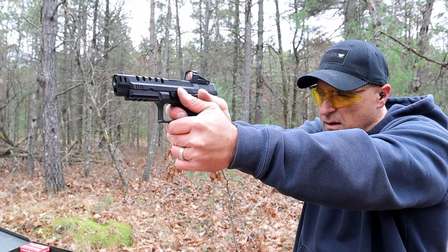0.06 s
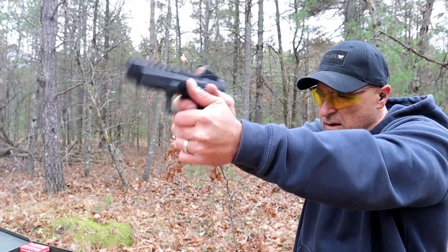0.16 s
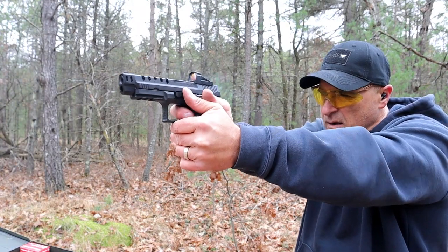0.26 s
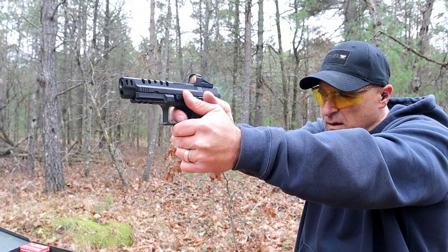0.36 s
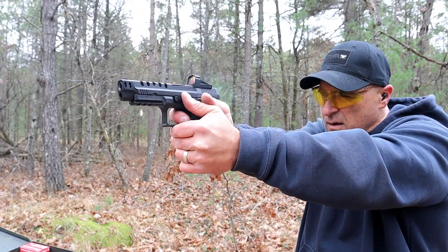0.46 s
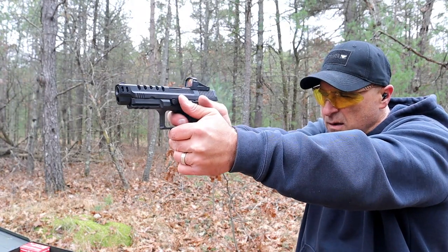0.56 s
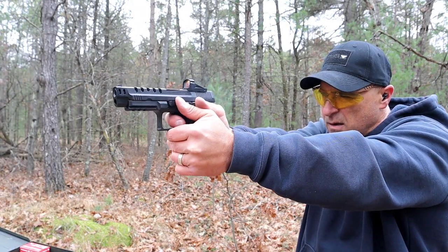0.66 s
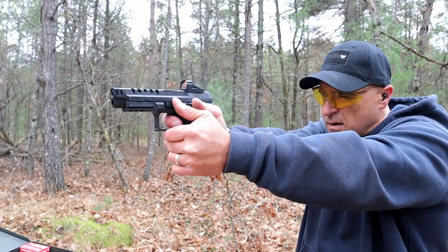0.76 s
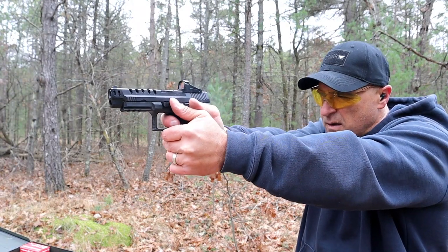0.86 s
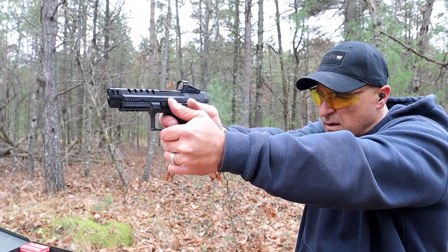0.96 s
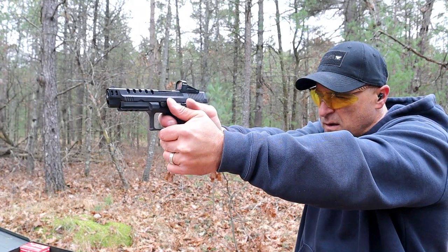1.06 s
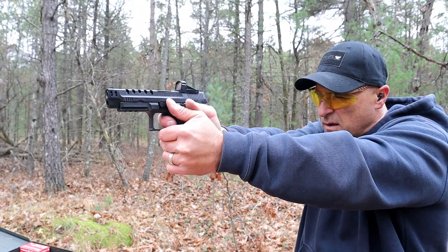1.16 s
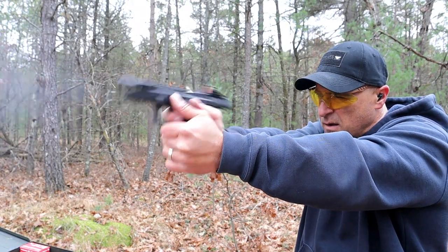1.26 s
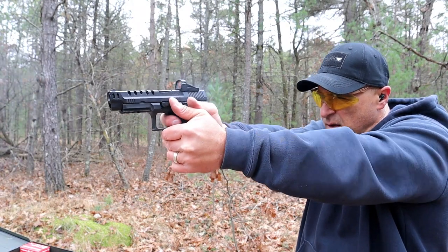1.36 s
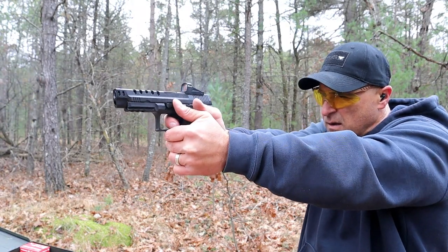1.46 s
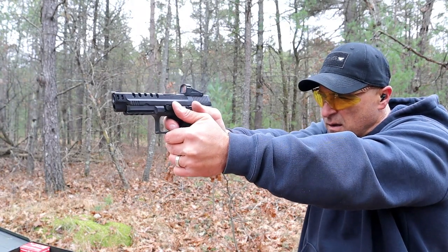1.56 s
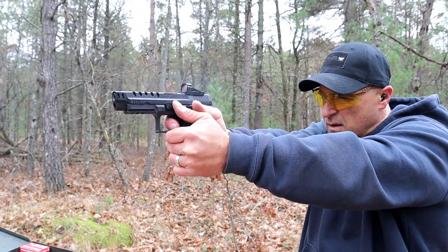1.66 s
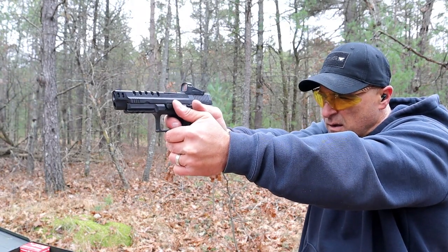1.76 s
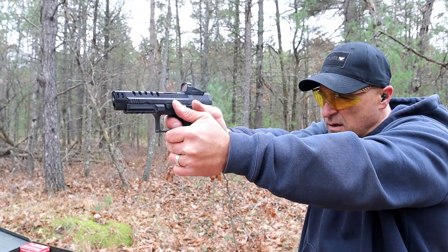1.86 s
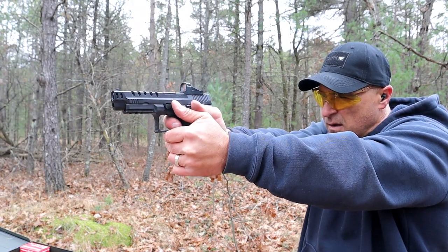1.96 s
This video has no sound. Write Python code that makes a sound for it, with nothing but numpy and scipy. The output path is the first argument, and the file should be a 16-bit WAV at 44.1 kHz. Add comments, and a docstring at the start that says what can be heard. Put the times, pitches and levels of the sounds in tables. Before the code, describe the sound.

A fading gunshot echo, then a handgun blast with a metallic ping downrange and a wash off the trees; faint handling ticks and a rustle, then a second blast with a sharper steel clang. Outdoors, close, clipped microphone.

```python
"""Two pistol shots at the edge of a wood, over the dying echo of an earlier one.
Each blast is a sharp shock wave plus fading noise and short rings, and it overloads the microphone.
The trees throw back a swelling, darkening wash of noise, and a steel plate rings downrange as a set of
beating tones. The clacks of the action, small ticks, a soft bump and a rustle are short bursts of noise.
A faint hiss and an outdoor rumble lie underneath."""
import sys
import numpy as np
from scipy import signal
from scipy.fft import rfft, irfft
from scipy.io import wavfile

SR = 44100
rng = np.random.default_rng(int(sys.argv[2]) if len(sys.argv) > 2 else 0)


def unload_audio(sound):
    """Save the sound as a 16-bit wav file, at the path given as the first command line argument."""
    columns = np.transpose(np.atleast_2d(sound))
    # keep every value between -1 and 1, then stretch to whole-number steps
    steps = np.round(np.clip(columns, -1, 1) * 32767)
    wavfile.write(sys.argv[1], SR, steps.astype(np.int16))


N = 90405
T = np.arange(N) / SR  # time in seconds

# The shots; the first comes before the sound begins, so only its echo is left.
# Each row: start in seconds, level of the blast in dB, level of the echo in dB.
SHOTS = [(-1.04, 0, -2.5), (0.2192, 3, 0.16), (1.3686, 3.5, -1)]


def from_db(db):
    """Turn decibels into a gain."""
    return 10 ** (np.asarray(db) / 20)


def rms_one(x):
    """Scale a sound to an rms (average strength) of 1."""
    return x / np.sqrt(np.mean(x ** 2) + 1e-20)


def noise(low_hz, high_hz):
    """Make noise between two frequencies, with an rms of 1."""
    band = [low_hz, min(high_hz, .45 * SR)]
    sos = signal.butter(2, band, "band", fs=SR, output="sos")
    white = rng.standard_normal(N + SR)
    return rms_one(signal.sosfilt(sos, white)[SR:])  # drop the second in which the filter settles


def noise_around(centre_hz):
    """Make noise in a narrow band around one frequency."""
    width = 1.31  # band edges as a ratio to the centre
    return noise(centre_hz / width, centre_hz * width)


def drift(rate_hz):
    """Make a smooth random wander around zero, with an rms of 1."""
    hz = np.arange(N // 2 + 1) * SR / N
    spectrum = rfft(rng.standard_normal(N))
    return rms_one(irfft(spectrum / (1 + (hz / rate_hz) ** 4), N))


def bands(table):
    """Split white noise into third octaves; give each at its table level, with the table's last column."""
    hz, level_db, extra = np.transpose(table)
    table_octave = np.log2(hz)
    white = rfft(rng.standard_normal(N)) * np.sqrt(SR / 2)  # 0 dB per Hz
    octave = np.log2(np.arange(N // 2 + 1) * SR / N + 1)
    for centre in np.arange(14, 44) / 3:
        distance = np.clip(3 * (octave - centre), -1, 1)
        window = np.cos(np.pi / 2 * distance) ** 2  # neighbouring bands overlap
        gain = from_db(np.interp(centre, table_octave, level_db))
        yield irfft(white * window, N) * gain, np.interp(centre, table_octave, extra)


def envelope(start, t60, attack=0, hold=0):
    """Rise in a straight line, hold (counted from the start), then fall by 60 dB in every t60 seconds."""
    age = T - start
    rise = np.clip(age / (attack + 1 / SR), 0, 1)
    return rise * np.exp(-np.log(1000) * np.maximum(age - hold, 0) / t60)


def ring(start, hz, t60):
    """A struck mode is a sine that starts at once and dies away."""
    return np.sin(2 * np.pi * hz * (T - start)) * envelope(start, t60)


def background():
    """A faint hiss and an outdoor rumble are two steady bands of noise."""
    hiss = from_db(-73) * noise(100, 13000)
    rumble = from_db(-69.5) * noise(30, 110)
    return hiss + rumble


def wood():
    """The echo swells as the blast reaches the trees, then thins with distance and loses its treble."""
    # The echo from the trees, before the level of each shot is added.
    # Each row: frequency in Hz, level in dB per Hz, loss to air and leaves in dB per second.
    echo_bands = [(40, -85.5, 10.5), (110, -69.5, 12), (203, -70, 12.5), (354, -56.5, -2), (625, -49, -3.5),
                  (990, -49, -2), (1560, -54, 5), (2410, -54.5, 15), (4400, -59, 34), (8500, -56, 67.5),
                  (14700, -69, 86.5)]
    treeline_s, swell_s = 0.2, 0.053  # round trip to the trees, build-up
    clearing_db = -8.5  # level before the swell
    spread_power = 1.502  # how steeply it falls with distance
    trunk_grain_db, trunks_per_s = 1.5, 90  # roughness of the echo

    ages = np.array([np.maximum(T - start, 0) for start, _, _ in SHOTS])
    levels = from_db([[echo_db] for _, _, echo_db in SHOTS])
    swell = np.exp(-.5 * (np.minimum(ages - treeline_s, 0) / swell_s) ** 2)
    build_up = swell + from_db(clearing_db) * (1 - swell)
    spreading = np.maximum(ages / treeline_s, 1) ** -spread_power
    shapes = levels * (ages > 0) * build_up * spreading
    coarse = slice(None, None, 40)  # work out the slow gains at every 40th sample
    out = 0
    for band, loss in bands(echo_bands):
        gains = shapes[:, coarse] * from_db(-loss * ages[:, coarse])
        total_gain = np.linalg.norm(gains, axis=0)  # the echoes add as energy
        out = out + band * np.interp(T, T[coarse], total_gain)
    return out * from_db(trunk_grain_db * drift(trunks_per_s))


def clicks():
    """Clacks of the action and small handling ticks are short bursts of narrow noise."""
    # Each row: start in seconds, level in dB, centre in Hz, time to fall by 60 dB in seconds.
    click_rows = [(.154, -52, 7500, .03), (.196, -55, 8500, .012), (.2702, -14, 8300, .025),
                  (.2877, -13, 6000, .007), (.804, -53, 11000, .02), (.932, -52, 6000, .015),
                  (1.025, -53, 5000, .03), (1.141, -57, 8000, .02), (1.236, -52, 6500, .02),
                  (1.255, -59, 8000, .02), (1.4177, -14, 8300, .025), (1.4323, -13, 1900, .025)]
    return sum(from_db(db) * noise_around(hz) * envelope(start, t60) for start, db, hz, t60 in click_rows)


def blasts():
    """An ignition crack, a shock wave, a jet of gas, and quick scatter and ringing from close by."""
    # The muzzle blast scattered off the nearby ground, before the level of each shot is added.
    # Each row: frequency in Hz, level in dB per Hz, time to fall by 60 dB in seconds.
    scatter_bands = [(40, -36.5, 0.04), (110, -29, 0.054), (250, -32, 0.065), (550, -35, 0.13),
                     (1114, -30.5, 0.086), (2000, -31.5, 0.051), (4300, -37.5, 0.068), (8500, -35, 0.053),
                     (14800, -47, 0.059)]
    # The hollow ring of the shooting position, before the level of each shot is added.
    # Each row: frequency in Hz, level in dB, time to fall by 60 dB in seconds.
    hollow_modes = [(100, -9, 0.059), (549, -8.5, 0.14), (770, -16.5, .1), (1040, -5, 0.083)]
    shock_s = .0005  # time for the shock's pressure to fall through zero
    lead_s = 0.0014  # the crack of ignition comes just ahead of the blast

    out = np.zeros(N)
    scatter = list(bands(scatter_bands))
    for start, blast_db, _ in SHOTS:
        lead = from_db(-13.5) * noise(1700, 3500) * envelope(start - lead_s, 0.025)
        phase = np.maximum(T - start, 0) / shock_s
        shock = from_db(13) * (T > start) * (1 - phase) * np.exp(-phase)
        jet = from_db(13.5) * noise(3000, 9000) * envelope(start, 0.013)  # gas leaving the muzzle
        near = sum(band * envelope(start, t60) for band, t60 in scatter)
        hollow = sum(from_db(db) * ring(start, hz, t60) for hz, db, t60 in hollow_modes)
        out += from_db(blast_db) * (lead + shock + jet + near + hollow)
    return out


def plates():
    """A splash, then each steel mode beats with its twin and arrives by many paths, so it wavers as it dies."""
    # The bullets striking steel.
    # Each row: start in seconds, attack in seconds, change of the ring in dB, level of the splash in dB.
    hits = [(.295, 0.081, 0.3, -44), (1.476, 0.0063, 2.36, -23)]
    # One list of modes for each hit, held up by the echoes; each mode has a close twin that beats with it.
    # Each row: frequency in Hz, rms level in dB with the beating and fading included (before the envelope
    # and the hit's change), hold in seconds, time to fall by 60 dB in seconds, distance to the twin in Hz,
    # strength of the twin as a share.
    plate_modes = [
        [(2064, -31, .29, 1.8, 2.2, .42), (3381, -37, .12, .85, 11, .3), (3560, -39.5, .11, .8, 14, .4),
         (3860, -40, .12, .52, 5, .3), (4753, -46, .12, .6, 12, .4), (5229, -31.5, .17, .52, 4, .4),
         (5959, -33.5, .21, .58, 4.3, .55), (7220, -38, .11, .58, 14, .5), (8053, -48, .12, .52, 17, .5),
         (8263, -45, .11, .45, 13, .5), (9310, -46, .11, .72, 15, .5), (10887, -52, .11, .6, 19, .5),
         (11560, -44.5, .13, .47, 11, .5), (13470, -57, .11, .7, 13, .5), (14372, -55, .11, .5, 18, .5)],
        [(2021, -29.5, .35, .8, 5.5, .4), (3438, -28, .27, .44, 6.5, .15), (3752, -43, .1, .55, 5, .3),
         (5127, -34.5, .15, .55, 7.5, .35), (7027, -29, .04, .62, 12, .45), (8027, -36, .15, .47, 9, .3),
         (8349, -31, .09, .45, 8, .2), (9105, -36, .15, .42, 8.5, .45), (10487, -40, .06, .4, 13, .5),
         (11142, -30, .05, .82, 16.3, .7), (13141, -38, .12, .62, 9, .7), (14061, -41, .12, .37, 14, .5),
         (15040, -55, .05, .8, 12, .6)],
    ]
    splash_t60_s = .14
    # Echoes interfere with the ring: size of the wander (radians, share of level), mode cycles per fade.
    fading, fade_cycles = .21, 420

    out = np.zeros(N)
    for (start, attack, ring_db, splash_db), modes in zip(hits, plate_modes):
        # the bullet shattering on the steel
        splash = noise(1500, 14400) * envelope(start, splash_t60_s, attack, attack)
        out += from_db(splash_db) * splash
        for hz, mode_db, hold, t60, split, twin in modes:
            phase = 2 * np.pi * hz * T + fading * drift(hz / fade_cycles)
            twin_phase = phase + 2 * np.pi * split * (T - start)
            pair = np.cos(phase) - twin * np.cos(twin_phase)
            wavering = rms_one(pair * (1 + fading * drift(hz / fade_cycles)))
            out += from_db(ring_db + mode_db) * wavering * envelope(start, t60, attack, hold)
    return out


def bump():
    """A soft bump is a short burst of low noise."""
    attack_s = 0.0033
    return from_db(-39) * noise_around(200) * envelope(.932, 0.06, attack_s, attack_s)


def rustle():
    """A rustle is a short burst of high noise whose level flutters quickly."""
    attack_s = 0.01
    flutter_db = 1.4 * drift(180)
    return from_db(-44 + flutter_db) * noise(3660, 10800) * envelope(1.03, 0.12, attack_s, attack_s)


def scene():
    """Add everything up at one microphone."""
    return (background() + wood() + clicks() + blasts() + plates() + bump() + rustle())[None]


def record(dry):
    """The input clips softly, a limiter ducks a few milliseconds late, and the top is cut."""
    overload = 0.95  # highest level the input can reach
    limit_db, limit_depth_db = -7.5, 5  # where the limiter starts, the most it takes away
    attack_s, release_db_per_s = 0.0067, 238.5
    cutoff_hz = 15900

    clipped = overload * np.tanh(dry / overload)
    level_db = 20 * np.log10(np.abs(dry) + 1e-9)
    over_db = np.clip(level_db - limit_db, 0, limit_depth_db)
    # follow each peak at once, then let go at a steady rate
    release_db = release_db_per_s * T
    held_db = np.maximum.accumulate(over_db + release_db, axis=-1) - release_db
    r = np.exp(-1 / (attack_s * SR))
    duck_db = signal.lfilter([1 - r], [1, -r], held_db)  # smoothing makes it late
    limited = clipped * from_db(-duck_db)
    top_cut = signal.ellip(12, .1, 80, cutoff_hz, fs=SR, output="sos")
    return signal.sosfilt(top_cut, limited)


dry = scene()
out = record(dry)
unload_audio(out)
```